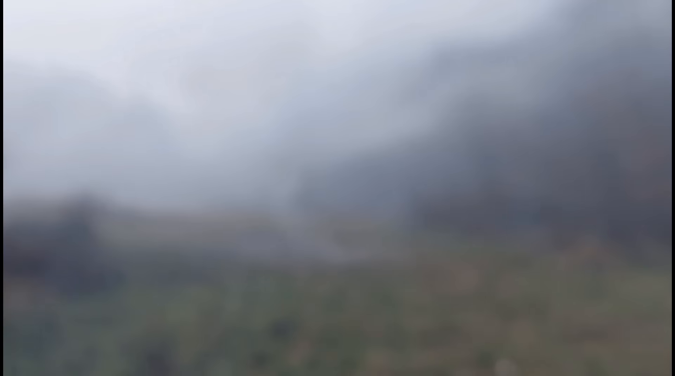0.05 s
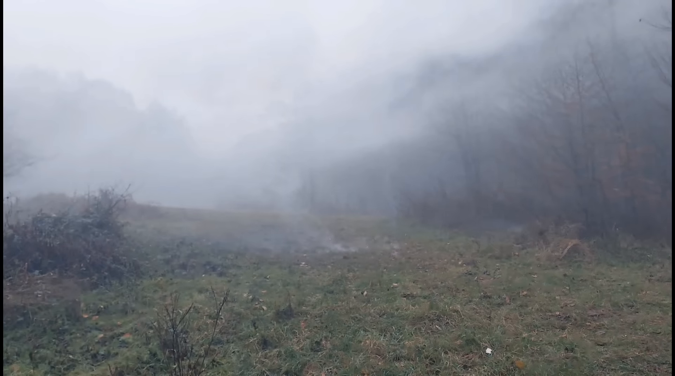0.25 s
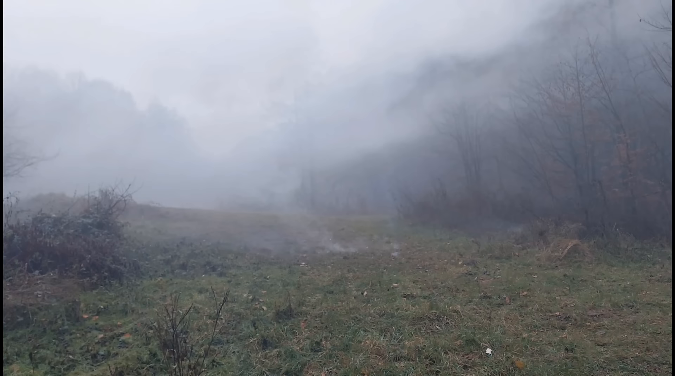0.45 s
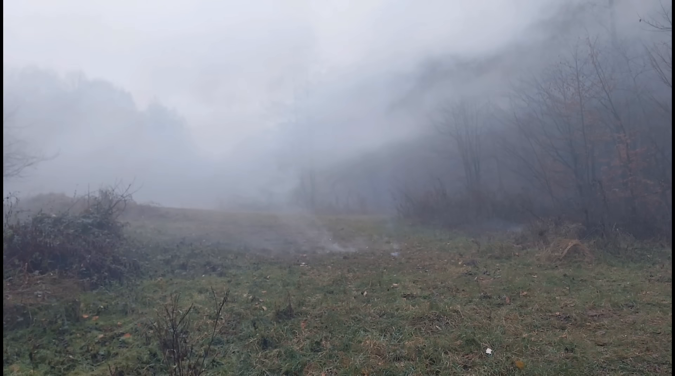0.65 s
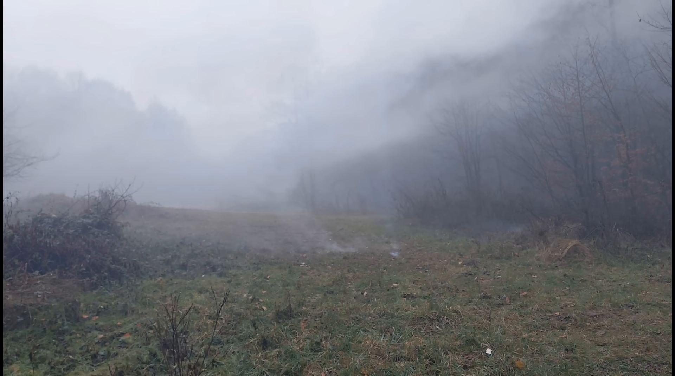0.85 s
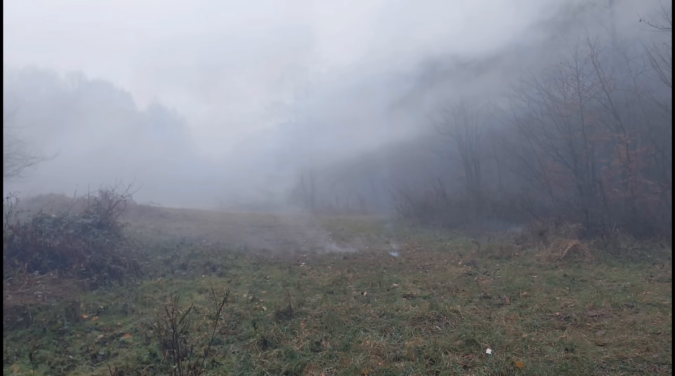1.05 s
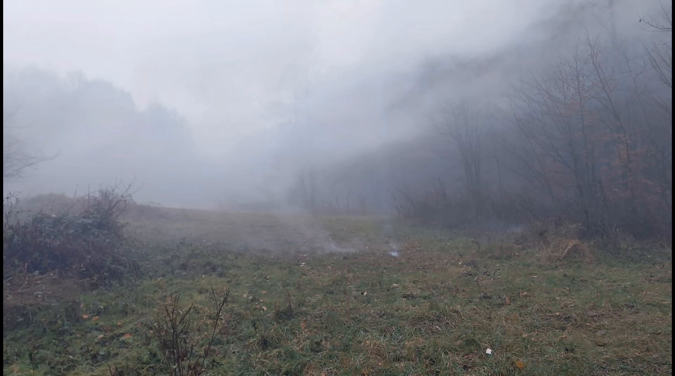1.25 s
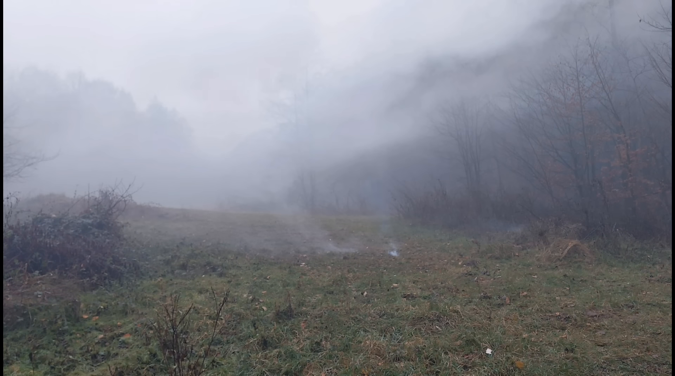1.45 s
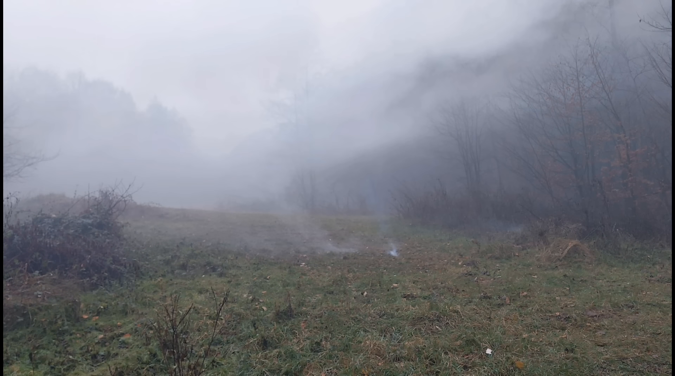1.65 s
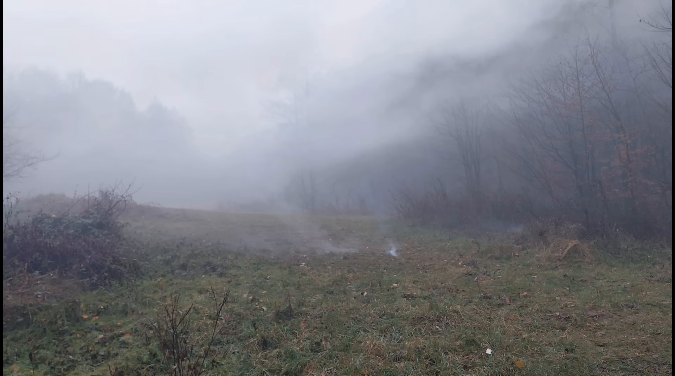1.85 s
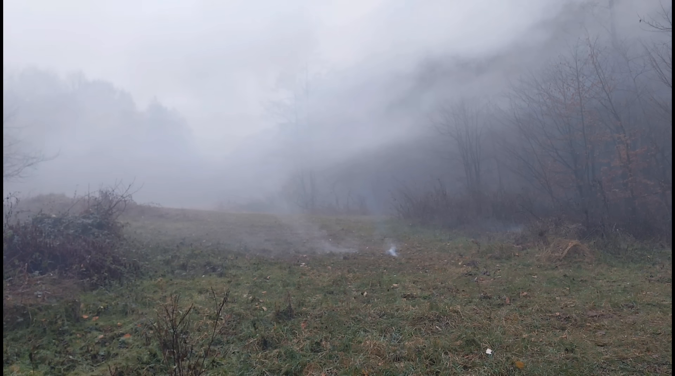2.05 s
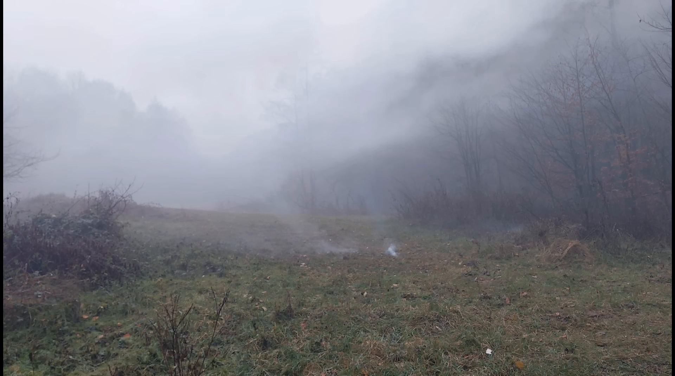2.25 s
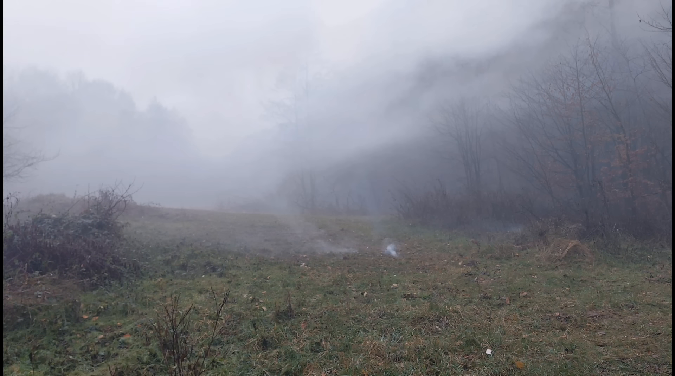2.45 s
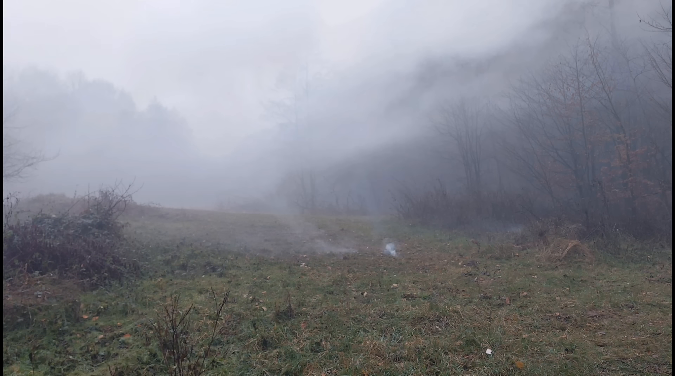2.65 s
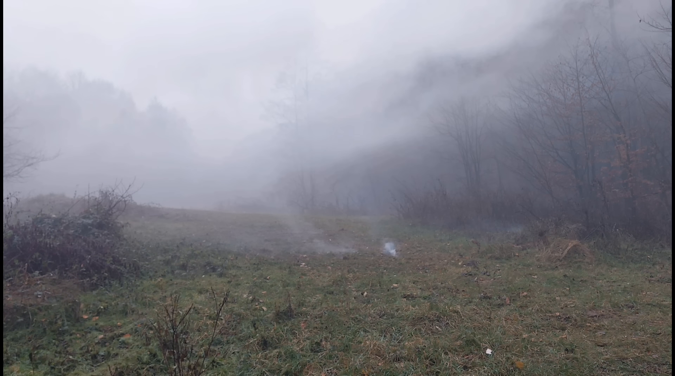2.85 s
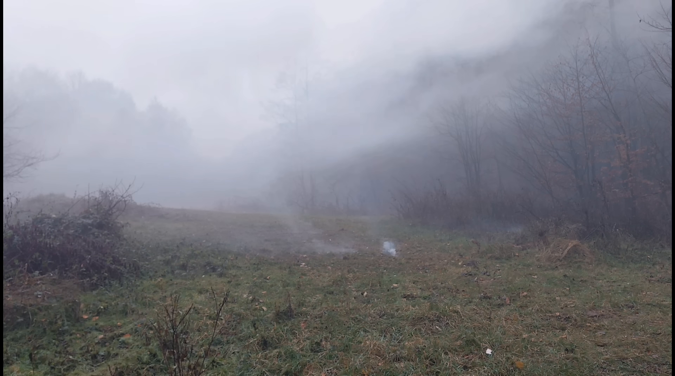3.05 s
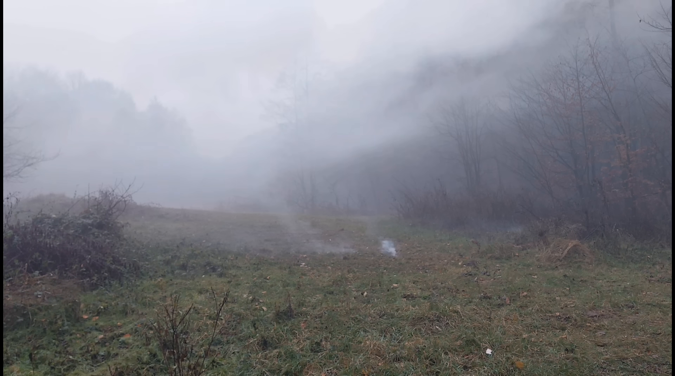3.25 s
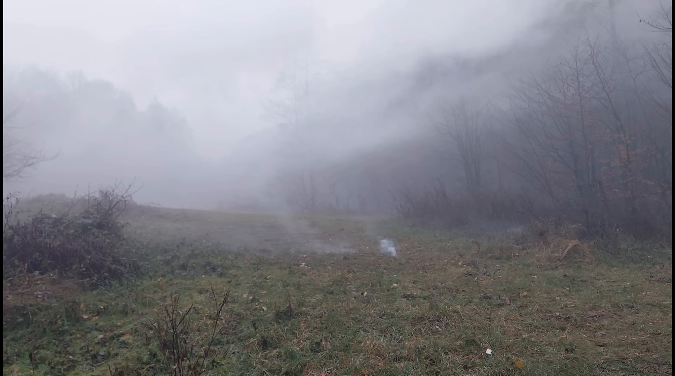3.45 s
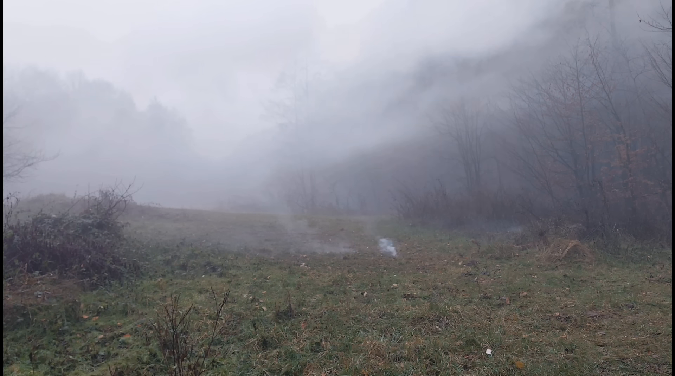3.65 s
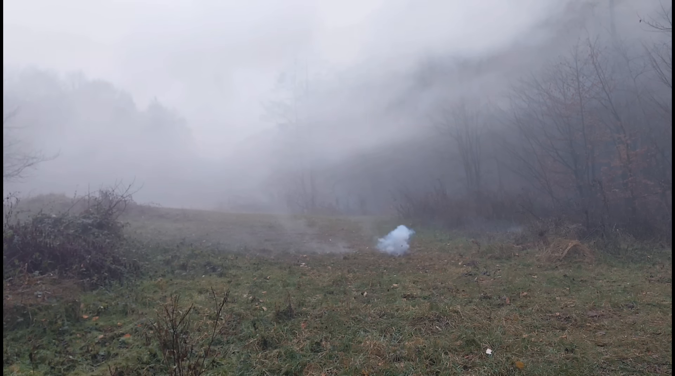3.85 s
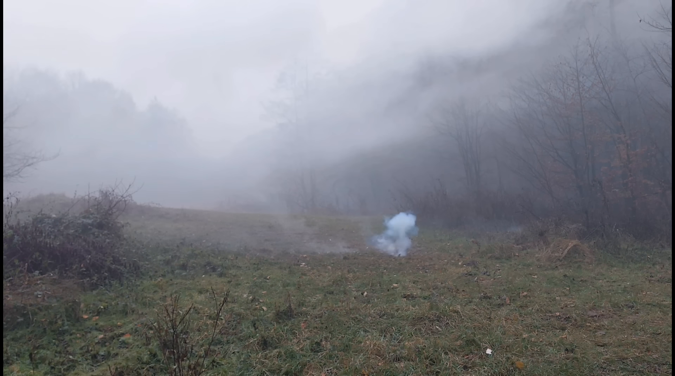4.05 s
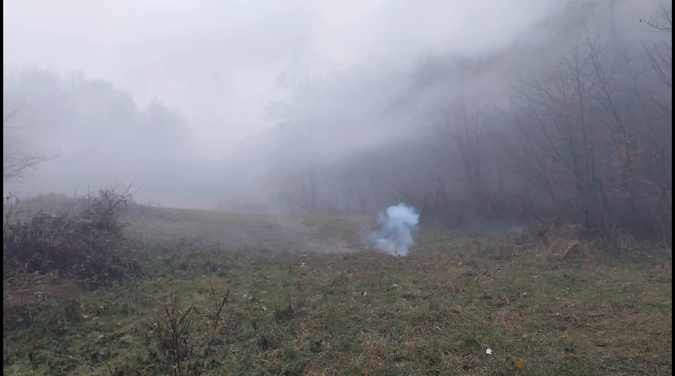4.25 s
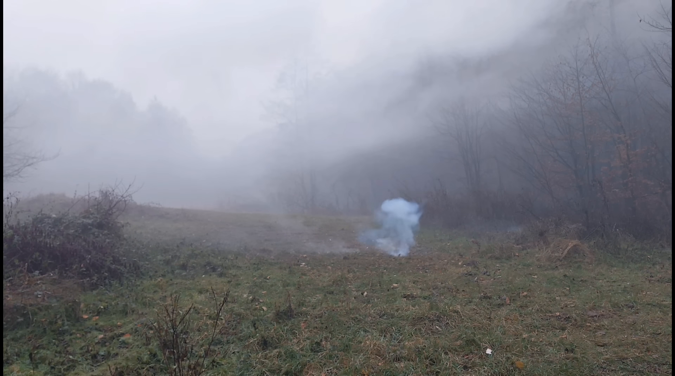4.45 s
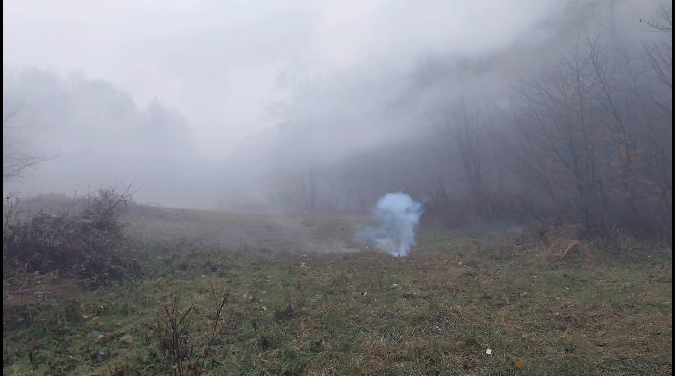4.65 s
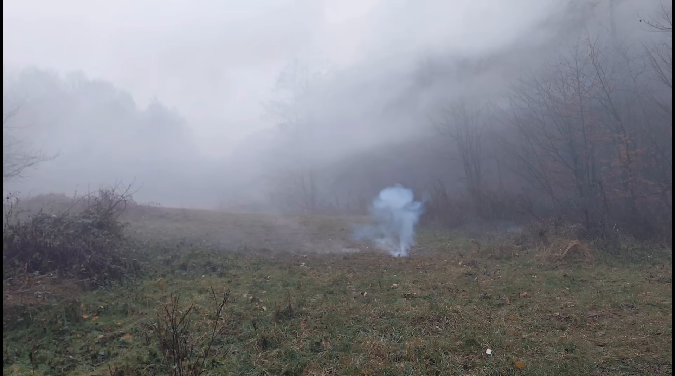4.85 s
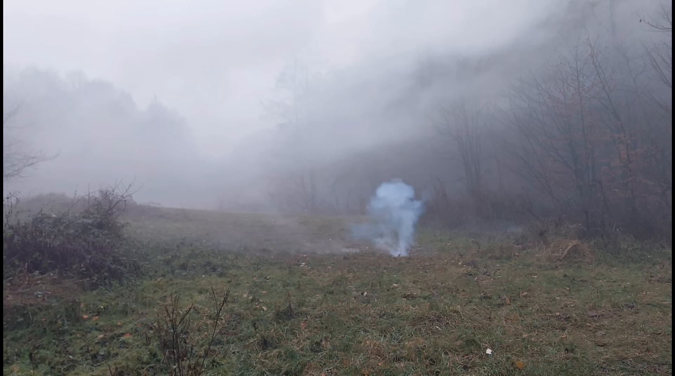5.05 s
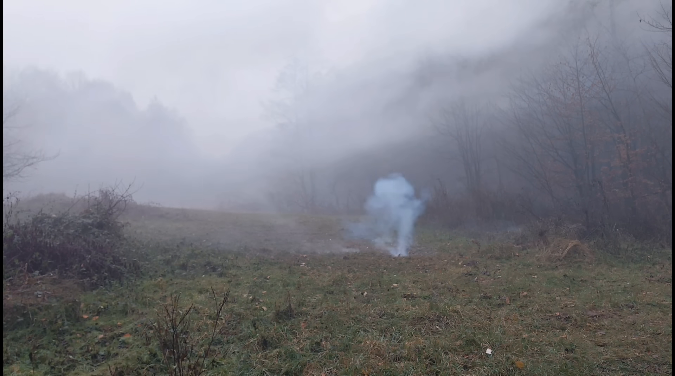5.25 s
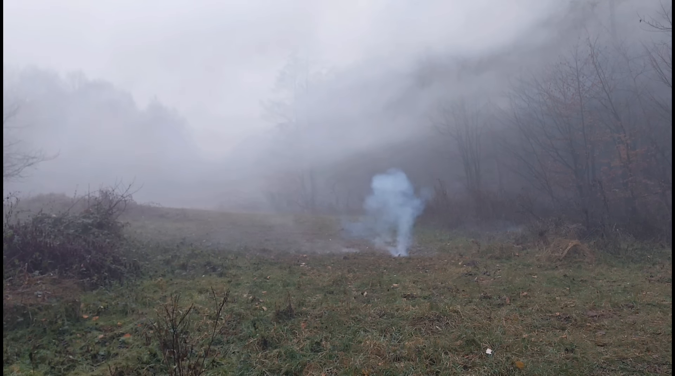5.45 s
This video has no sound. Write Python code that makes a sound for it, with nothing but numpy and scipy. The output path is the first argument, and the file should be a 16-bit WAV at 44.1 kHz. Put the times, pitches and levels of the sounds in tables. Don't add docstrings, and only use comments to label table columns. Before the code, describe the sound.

Soft cloth rubbing close to the microphone, then a hard firecracker crack that echoes off wooded slopes and rolls away, slowly dulling.

```python
import sys
import numpy as np
from scipy import signal
from scipy.fft import rfft, irfft
from scipy.io import wavfile

SR = 44100
rng = np.random.default_rng(int(sys.argv[2]) if len(sys.argv) > 2 else 0)


def to_wav(s):
    ch = np.atleast_2d(s).T
    pcm = np.round(np.clip(ch, -1, 1) * 32767)
    wavfile.write(sys.argv[1], SR, pcm.astype(np.int16))


def convert_level_to_amplitude(level_db):
    exponent = np.asarray(level_db, float) / 20
    return 10 ** exponent


N = 242538
T = np.arange(N) / SR
STEP = 32
SLOW = T[::STEP]


def at_pitch(points, hz):
    table = np.array(points)
    return np.interp(np.log(hz), np.log(table[:, 0]), table[:, 1])


def in_time(rows):
    s, *columns = np.transpose(rows)
    return np.array([np.interp(SLOW, s, column) for column in columns])


def drift(rate_hz):
    r = np.exp(-2 * np.pi * STEP * rate_hz / SR)
    settle = 2000
    white = rng.standard_normal(len(SLOW) + settle)
    slow = signal.lfilter([1], [1, -2 * r, r * r], white)[settle:]
    return slow / slow.std()


def sides(pan_db):
    return convert_level_to_amplitude(np.array([.5 * pan_db, -.5 * pan_db]))


def add(out, sound, s):
    i = round(s * SR)
    out[:, i:i + sound.shape[1]] += sound[:, :N - i]


def resonance(x, hz, width_hz):
    r = np.exp(-np.pi * width_hz / SR)
    top = (1 - r * r) / 2
    return signal.lfilter([top, 0, -top], [1, -2 * r * np.cos(2 * np.pi * hz / SR), r * r], x)


def bump(s, width_s):
    return np.exp(-((SLOW - s) / width_s) ** 2)


BAND_EDGES = 17000 / 2 ** np.arange(9.2, -.1, -.4)


def bands(white, colour, alike_table, levels_db, level_hz, patchy_db, flicker_hz, top_loss=0):
    t = T[N - white.shape[-1]:]
    centres, widths = np.sqrt(BAND_EDGES[1:] * BAND_EDGES[:-1]), np.diff(BAND_EDGES)
    place = np.interp(np.log(centres), np.log(level_hz), np.arange(len(level_hz)))
    power = convert_level_to_amplitude(at_pitch(colour, centres)) ** 2 * widths
    sums = np.bincount(np.round(place).astype(int), power, len(level_hz))
    lift = levels_db - 10 * np.log10(sums + 1e-12)[:, None]
    out, together = 0, drift(flicker_hz)
    for k in np.flatnonzero((centres > colour[0][0]) & (centres < colour[-1][0])):
        band = signal.butter(2, BAND_EDGES[k:k + 2], "band", fs=SR, output="sos")
        mid, side = signal.sosfilt(band, white[k % 2])
        low = min(int(place[k]), len(level_hz) - 2)
        db = lift[low] + (place[k] - low) * (lift[low + 1] - lift[low])
        db = db + at_pitch(colour, centres[k])
        db = db - top_loss * max(np.log2(centres[k] / level_hz[-1]), 0)
        patches = patchy_db * (0.31 * together + 0.65 * drift(flicker_hz))
        gain = convert_level_to_amplitude(db + patches) * np.sqrt(SR / 2)
        alike = np.clip(at_pitch(alike_table, centres[k]), -.9, 1)
        side = side * np.sqrt((1 - alike) / (1 + alike))
        out = out + np.interp(t, SLOW, gain) * np.array([mid + side, mid - side])
    return np.pad(out, ((0, 0), (N - len(t), 0)))


# [f/Hz, level/dB per Hz]
RUMBLE_COLOUR = [(13, -34), (22, 1), (69, 1.5), (134, -8), (183, -12), (289, -12), (500, -18.5), (650, -46),
                 (1100, -120)]
# [f/Hz, likeness -1..1]
NEAR_ALIKE = [(60, 0.81), (240, 0.55), (950, 0.3), (3770, -0.16), (15000, 0.11)]
# [f/Hz, level/dB]
HISS = [(240, -14.5), (400, -29), (644, 11.5), (1620, -13), (1920, 0), (3500, -19), (6570, -1.5), (9370, 4),
        (15800, 4)]
HISS_DB = -79.5
RUMBLE_DB, RUMBLE_PAN_DB, RUMBLE_SINK_DB_PER_S = -72.5, 6.0, 5.5


def background():
    level = RUMBLE_DB - RUMBLE_SINK_DB_PER_S * np.maximum(SLOW - FRONTS[0][0], 0)
    levels = np.array([level, level])
    white = rng.standard_normal((2, 2, N))
    rumble = bands(white, RUMBLE_COLOUR[:-1], NEAR_ALIKE, levels, [1000, 2000], 3.2, 6.1)
    colour = convert_level_to_amplitude(at_pitch(HISS, np.arange(N // 2 + 1) * SR / N + 1))
    hiss = irfft(rfft(rng.standard_normal((2, N))) * colour, N)
    return rumble * sides(RUMBLE_PAN_DB)[:, None] + convert_level_to_amplitude(HISS_DB) * hiss / hiss.std()


# [start t/s, hold t/s, level/dB,
# rub f/Hz, t/s to fade 20 dB]
MOVES = [(0.0, 0.017, -70, 5130, .4), (0.0, 0.29, -72, 13000, .2), (0.103, 0.28, -79.5, 610, .2),
         (0.197, 0.085, -74.5, 4960, 0.25), (0.382, 0.184, -66, 13800, 0.19),
         (0.534, 0.0355, -75.5, 4500, .35), (0.75, 0.32, -68.5, 13500, .12), (0.84, .15, -67.5, 5500, .2),
         (0.977, .05, -76, 810, 1.5), (1.255, .06, -55.5, 1710, .12), (1.23, .09, -55.5, 12600, .09),
         (1.4, 0.055, -60.5, 8000, .1), (1.5, .13, -56, 1200, 0.27), (1.59, 0.0376, -57.5, 13000, 0.35),
         (1.617, 0.27, -58.5, 5540, 0.4), (1.677, 0.094, -63, 596, 0.11), (2.073, 0.069, -73.5, 5580, 0.55),
         (2.595, 0.256, -71, 5540, 0.36), (2.935, .28, -67, 7500, 0.25), (2.938, .02, -81, 600, .15),
         (3.176, 0.18, -77, 1060, .3), (3.4, .15, -76, 7570, 0.8), (3.633, 0.108, -69, 4100, 0.2),
         (3.772, .12, -59, 12800, 0.16),
         (3.72, .15, -69, 1350, 0.27),
    (4.33, .06, -72, 13500, 0.22),
    (4.64, 0.096, -77, 13500, .1),
    (4.82, 0.034, -69, 13500, 0.43),
         (0.0, .03, -76, 350, .1), (1.17, .04, -66, 1300, .15), (1.1, .06, -72, 5000, .2),
         (1.17, .05, -62, 11000, .15), (3.5, .05, -79, 1300, .15), (0.1, .06, -72, 220, .1),
         (0.8, .15, -77.5, 300, .2), (1.15, .08, -71, 300, .2), (1.56, .17, -64.5, 200, .15),
         (1.82, .1, -69, 1500, .15), (1.4, .05, -69, 1900, .1), (2.8, .3, -79, 2600, .2),
         (2.9, .05, -77, 300, .1), (3.38, .04, -72, 300, .08), (3.58, .08, -75, 550, .15),
         (2.68, .2, -77.5, 14000, .2), (3.58, 0.11, -73, 14000, .2), (1.95, 0.063, -68.5, 13000, .2)]
# [t/s, left-right level/dB]
CLOTH_PAN = [(0.0, -2.0), (0.23, 5), (0.43, -2.5), (0.69, -3), (0.98, 3), (1.11, -0.5), (2.61, 5),
             (3.24, 0.5), (3.47, 3.5), (3.8, 0.5)]
CLOTH_HZ = [220, 650, 1550, 5000, 13000]
# [f/Hz, level/dB per Hz]
CLOTH_COLOUR = [(88, -32), (150, 0.5), (169, -4), (291, -1.5), (405, -6), (866, -1.5), (1160, -2),
                (1470, -0.5), (2740, -6), (7250, -10), (9520, -15.5), (11800, -14), (15800, -12)]
RISE_SHARE = 0.519
RUB_DB_PER_OCT2 = 5.5


def cloth():
    power = convert_level_to_amplitude(-97) ** 2
    for s, hold, db, hz, fade in MOVES:
        before, after = (s - SLOW) / RISE_SHARE, SLOW - s - hold
        away = np.maximum(np.maximum(before, after), 0) / fade
        octaves_off = np.log2(np.c_[CLOTH_HZ] / hz)
        power = power + convert_level_to_amplitude(db - 20 * away - RUB_DB_PER_OCT2 * octaves_off ** 2) ** 2
    levels = 10 * np.log10(power) - .3
    grain = rng.standard_normal((2, 2, N)) * convert_level_to_amplitude(1.5 * rng.exponential(1, N))
    noise = bands(grain / grain.std(), CLOTH_COLOUR, NEAR_ALIKE, levels, CLOTH_HZ, 1.1, 18.6)
    return noise * sides(np.interp(T, *np.transpose(CLOTH_PAN)))


# [t/s, peak level/dB, f/Hz, left-right level/dB]
TICKS = [(0.284, -58.5, 1165, -9.5), (1.065, -58.5, 830, -4), (1.508, -43.5, 810, -0.5),
         (1.577, -46, 653, 0.5), (1.58, -39, 1310, -2), (1.604, -47, 1390, 0.5), (1.625, -43, 851, 0),
         (1.647, -52.5, 1170, 2.5), (1.683, -50, 735, 5), (1.707, -59.5, 886, 4.0), (1.797, -51, 869, 6),
         (2.946, -56, 990, 11), (3.087, -63.5, 786, 5.5), (3.171, -58, 743, 1.5), (3.257, -58.5, 790, 2.0),
         (3.366, -52, 1230, 7.5), (3.452, -56, 734, 0.5), (3.608, -56.5, 557, 6), (3.713, -56.5, 516, 4.5),
         (1.369, -50, 950, -2.5), (1.105, -62, 900, 0),
         (0.9386, -47, 4880, 3), (1.3693, -48, 3580, 2.5), (1.483, -36.5, 2120, 2.5),
         (1.6348, -32.5, 2090, -0.5), (2.4698, -53, 3300, 2), (2.7671, -57, 2370, 8.5),
         (1.492, -43, 6240, 4), (4.6114, -65, 8790, 8.5), (4.6224, -56, 8410, 10.5),
         (4.626, -49.5, 5920, 2.0), (5.1627, -67.5, 6240, 6.0), (5.3208, -64, 6420, 6),
         (5.383, -66.5, 7880, 9.0), (5.458, -62.5, 6360, 17)]
# [f/Hz, level/dB]
SNAP_SHARE = [(1200, -18), (2200, -8), (4000, 0.5), (7000, -5.5)]


def ticks():
    t, out = T[:SR // 40], np.zeros((2, N))
    for s, db, hz, pan_db in TICKS:
        swell = .00008 + .33 / hz
        ring = np.sin(2 * np.pi * hz * t) * t / swell * np.exp(1 - t / swell)
        snap = convert_level_to_amplitude(at_pitch(SNAP_SHARE, hz)) * rng.standard_normal((2, len(t))) * np.exp(-t / 0.0015)
        add(out, convert_level_to_amplitude(db + 1.5) * (ring + snap) * sides(pan_db)[:, None], s + .0007)
    return out


# [t/s, level/dB]
ROLL = [(3.865, -11), (3.885, -34.5), (3.91, -24), (3.96, -23), (4.05, -27.5), (4.2, -31), (4.4, -33.5),
        (4.9, -43.5), (5.47, -53)]
ROLL_HZ = [135, 290, 1800, 5000]
ROLL_BAND_DB = [-13, -3.5, -8, -11]
# bass leaks between trunks, air eats treble [level/dB per s]
ROLL_LOSS_DB_PER_S = [11, -2, 4, 26.5]
FAR_GAIN_DB_PER_S = [15, 15.5, 15, 3]
# [f/Hz, level/dB per Hz]
ROLL_COLOUR = [(18, -60), (30, -28.5), (64, -22.5), (145, -4.5), (174, -9.5), (326, -1), (496, -0.5),
               (955, -14), (1150, -13.5), (1790, -14), (1940, -14.5), (6830, -32), (9600, -39.5),
               (12800, -34), (15800, -37)]
# [f/Hz, likeness -1..1]
ROLL_ALIKE = [(60, 0.91), (150, 0.95), (380, 0.68), (950, -0.48), (2380, 0.056), (5980, -0.14),
              (15000, 0.43)]
GAP_DB = [13, 8.5, -6.5, 8.5]
# [t/s, depth t/s, lift level/dB]
STANDS = [
    (3.927, 0.0087, 9.5),
    (3.966, .01, 9),
    (3.99, 0.009, 6),
    (4.073, 0.014, 10.5),
    (4.105, .01, 6),
    (4.2, .05, 1.5),
]
STAND_SHARE = [0.25, 0.89, .2, .05]
GAP_S, GAP_WIDTH_S, FAR_SLOPE_S = 3.888, 0.0094, 4.88
AIR_LOSS = 39
ROLL_PAN_DB = -1.5


def roll():
    start = ROLL[0][0] - .005
    white = rng.standard_normal((2, 2, N - round(start * SR)))
    path = np.clip(SLOW - start - .15, -.05, None)
    stands = sum(db * bump(s, depth) for s, depth, db in STANDS)
    levels = in_time(ROLL) + np.c_[ROLL_BAND_DB] - np.c_[ROLL_LOSS_DB_PER_S] * path
    levels = levels + np.c_[FAR_GAIN_DB_PER_S] * np.maximum(SLOW - FAR_SLOPE_S, 0)
    levels = levels + np.c_[STAND_SHARE] * stands + np.c_[GAP_DB] * bump(GAP_S, GAP_WIDTH_S)
    noise = bands(white, ROLL_COLOUR, ROLL_ALIKE, levels, ROLL_HZ, 1.3, 24.7, AIR_LOSS * path)
    rise = np.clip((T - start) / .03, 0, 1)
    return rise * convert_level_to_amplitude(0.5) * sides(ROLL_PAN_DB)[:, None] * noise


# [t/s, peak level/dB, f/Hz, left-right level/dB]
ECHOES = [(3.911, -19, 448, 0.0), (3.924, -18, 350, -3), (3.936, -9, 520, -4.5), (3.947, -25.5, 813, -10),
          (3.959, -2.5, 536.3, -4), (3.964, -3, 430, -3.5), (3.984, -5, 400, 4), (3.995, -19, 330, -5.5),
          (4.014, -11, 438, -5.5), (4.041, -21, 370, -7), (4.059, -16, 328, 5), (4.077, -11, 412.3, -19),
          (4.099, -10, 569, -4), (4.108, -18.5, 468, 1), (4.129, -14, 487, -1), (4.169, -16, 470, -7),
          (4.248, -17.5, 315, 0), (4.442, -18, 494, -8), (4.551, -22.5, 399, -8.5), (5.074, -25, 427, -1),
          (5.164, -28.5, 340, 0.5), (5.206, -29, 400, -1.5), (5.412, -24, 479, -6)]
ECHO_T60_S, ECHO_SMEAR = 0.027, 0.015


def echoes():
    t, out = T[:SR // 5], np.zeros((2, N))
    for (s, db, hz, pan_db), turn in zip(ECHOES, rng.random((len(ECHOES), 3))):
        t60 = ECHO_T60_S + ECHO_SMEAR * (s - FRONTS[0][0])
        ring = np.sin(2 * np.pi * (hz * t + turn[0]))
        ring = ring + .5 * np.sin(2 * np.pi * (1.695 * hz * t + turn[1:, None]))
        swell = 1 - np.exp(-t / 0.0021)
        add(out, ring * convert_level_to_amplitude(db - 5.5 - 60 * t / t60) * swell * sides(pan_db)[:, None], s)
    return out


# [t/s, push level/dB, crackle level/dB]
FRONTS = [
    (3.8572, -12, -14),
    (3.85955, -8.5, -19),
    (3.8692, -22, -28),
    (3.8725, -22, -34),
]
# [f/Hz, level/dB, t60 t/s]
RECOIL = [
    (205, -10.5, .025),
    (305, -11, .13),
    (152, -19, .1),
]
# [f/Hz, level/dB, t60 t/s]
THUD = [
    (100, -23, .09),
    (72, -27, .12),
]
# [f/Hz, level/dB, t60 t/s]
HIGH_RING = (490, -14.5, .045)
# [t/s, f/Hz, left level/dB, right level/dB, swell t/s]
TREMOR = (3.8518, 500, -14, -26, .0024)
FRONT_S = .00082
PORT_HZ, PORT_WIDTH_HZ = 13300, 3500


def blast():
    t, body, crackle = T[:SR // 3], np.zeros((2, N)), np.zeros((2, N))
    for s, push_db, crackle_db in FRONTS:
        white = rng.standard_normal((2, len(t)))
        rough = 1.4 * sides(-4.5)[:, None] * resonance(white, PORT_HZ, PORT_WIDTH_HZ)
        rough = rough + 1.3 * resonance(white, 4300, 4500)
        pressed = t < FRONT_S
        add(crackle, convert_level_to_amplitude(crackle_db) * rough * (pressed + 0.15 * np.exp(-t / 0.0026)), s)
        add(body, convert_level_to_amplitude(push_db) * pressed * np.ones((2, 1)), s)

    recoil = sum(-convert_level_to_amplitude(db - 60 * t / t60) * np.cos(2 * np.pi * hz * t) for hz, db, t60 in RECOIL)
    recoil += sum(convert_level_to_amplitude(db - 60 * t / t60) * np.sin(2 * np.pi * hz * t) for hz, db, t60 in THUD)
    hz, db, t60 = HIGH_RING
    recoil -= convert_level_to_amplitude(db - 60 * t / t60) * np.sin(2 * np.pi * hz * t)
    add(body, recoil * sides(1.2)[:, None], FRONTS[0][0] + FRONT_S)

    s, hz, left_db, right_db, swell = TREMOR
    tremor = (t / swell) ** 2 * np.exp(2 - 2 * t / swell) * np.sin(2 * np.pi * hz * t)
    add(body, tremor * convert_level_to_amplitude(np.array([[left_db], [right_db]])), s)

    rounded = signal.sosfilt(signal.butter(2, 2200, fs=SR, output="sos"), body)
    return signal.sosfilt(signal.butter(1, 60, "high", fs=SR, output="sos"), rounded) + crackle


def scene():
    return background() + cloth() + ticks() + roll() + echoes() + blast()


def band_limit(x):
    return signal.sosfilt(signal.butter(12, 16450, fs=SR, output="sos"), x)


DIP_HZ, DIP_WIDTH_HZ, DIP_SHARE = 9850, 1200, .45


def record(dry):
    cut = signal.sosfilt(signal.butter(4, 40, "high", fs=SR, output="sos"), dry)
    cut = cut - DIP_SHARE * resonance(cut, DIP_HZ, DIP_WIDTH_HZ)
    cut = signal.sosfilt(signal.ellip(12, .5, 70, 15800, fs=SR, output="sos"), cut)
    mix = np.clip(cut, -.97, .97)
    return band_limit(mix)


dry = scene()
out = record(dry)
to_wav(out)
```